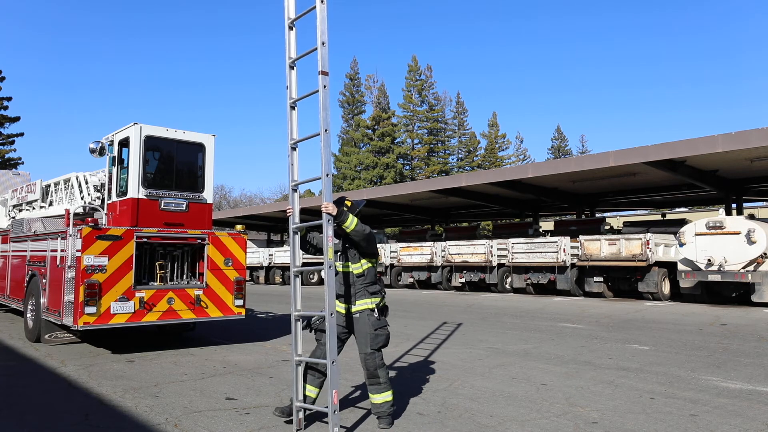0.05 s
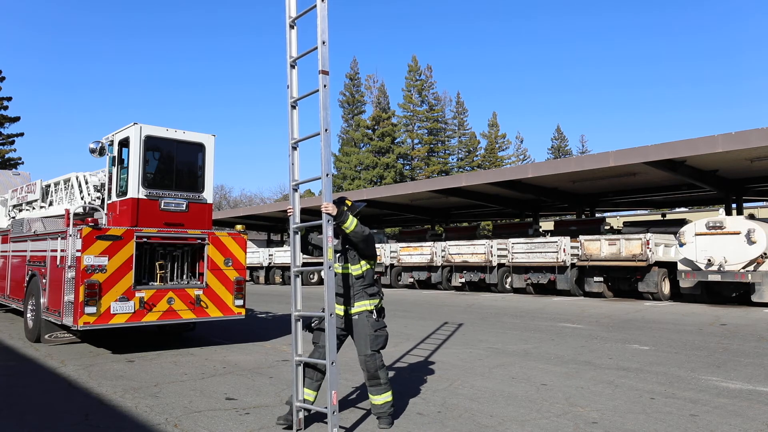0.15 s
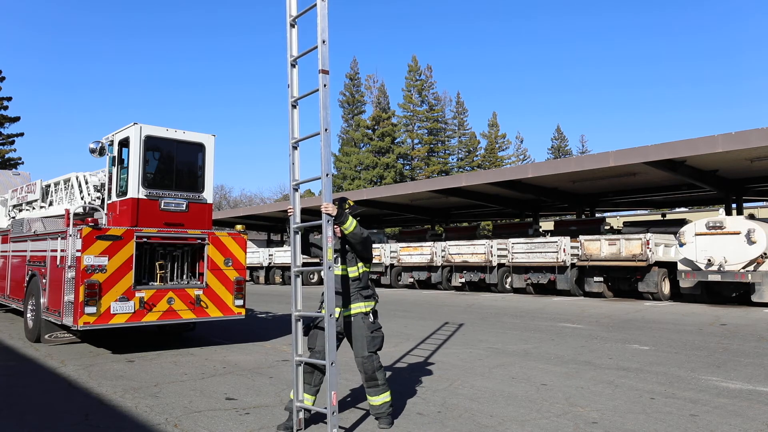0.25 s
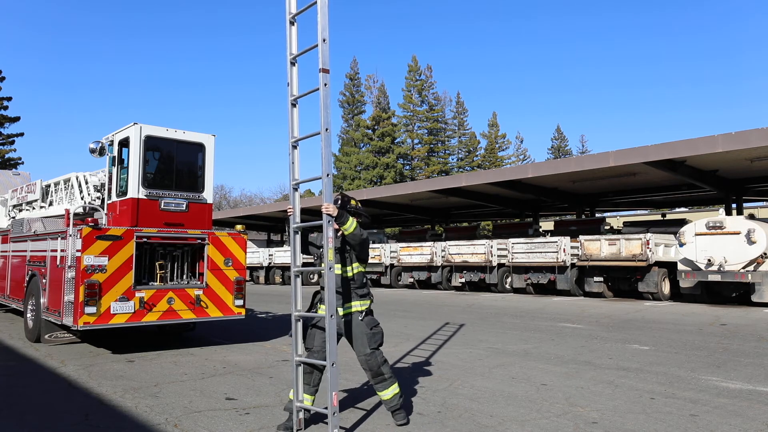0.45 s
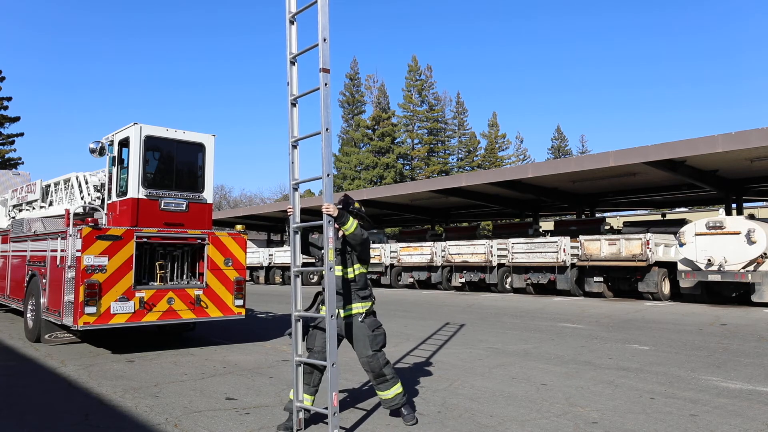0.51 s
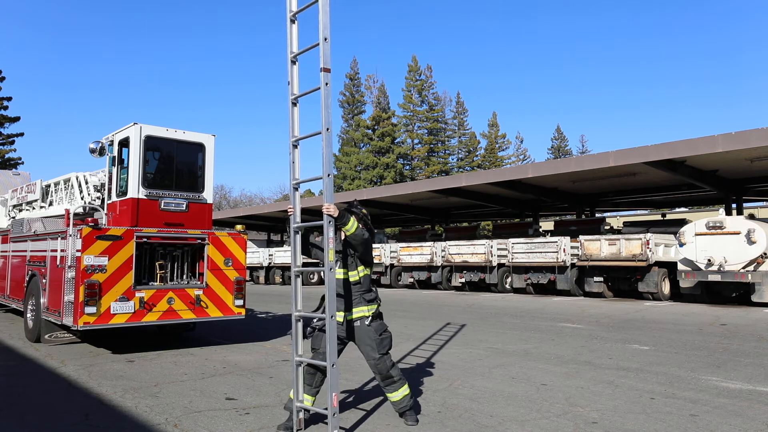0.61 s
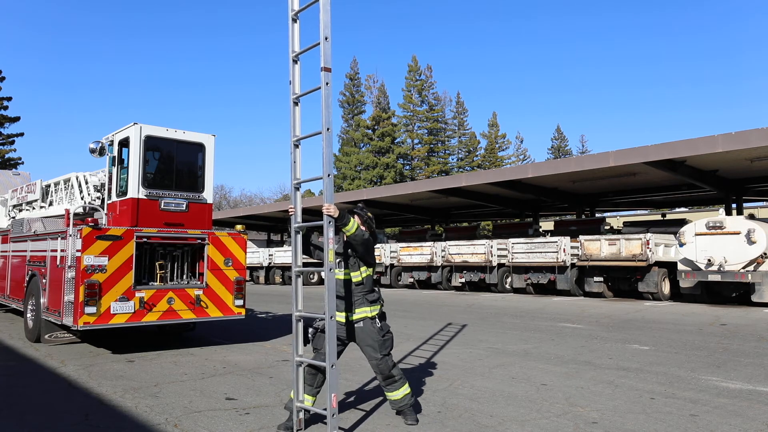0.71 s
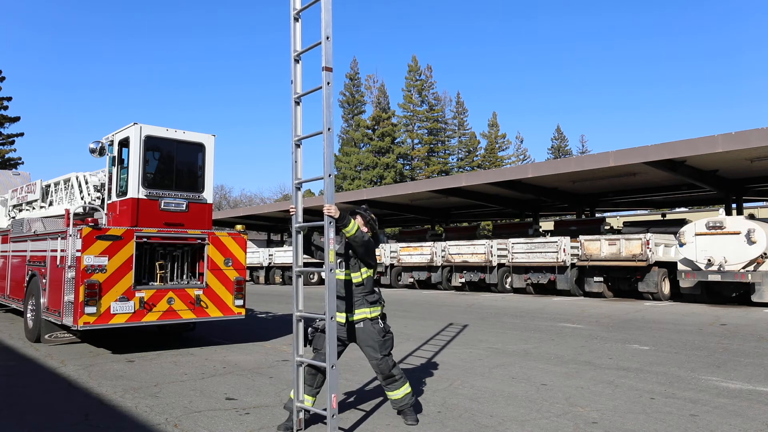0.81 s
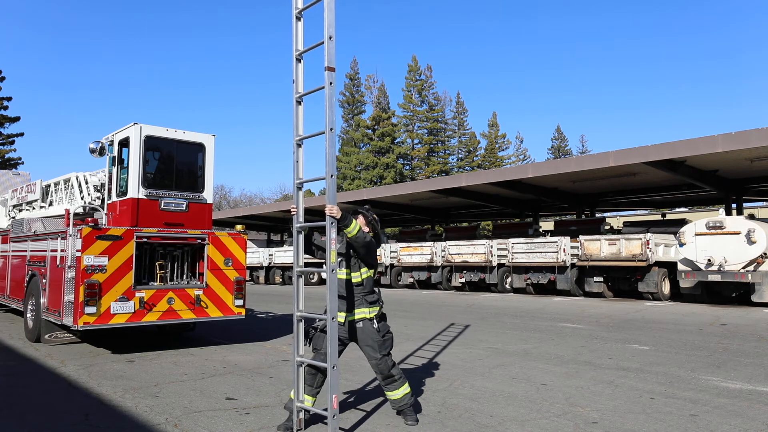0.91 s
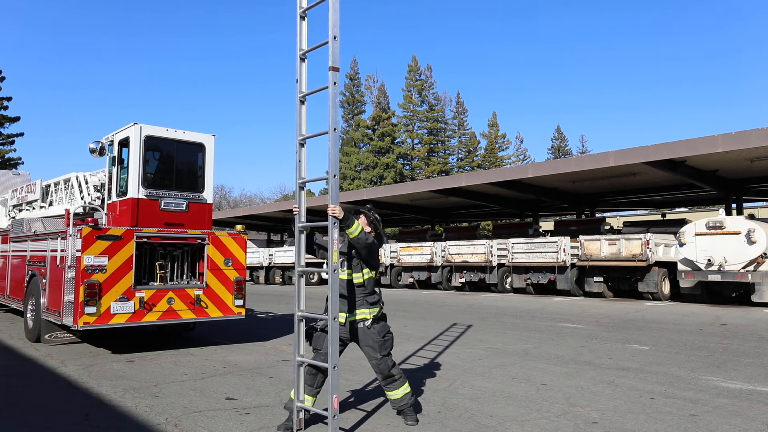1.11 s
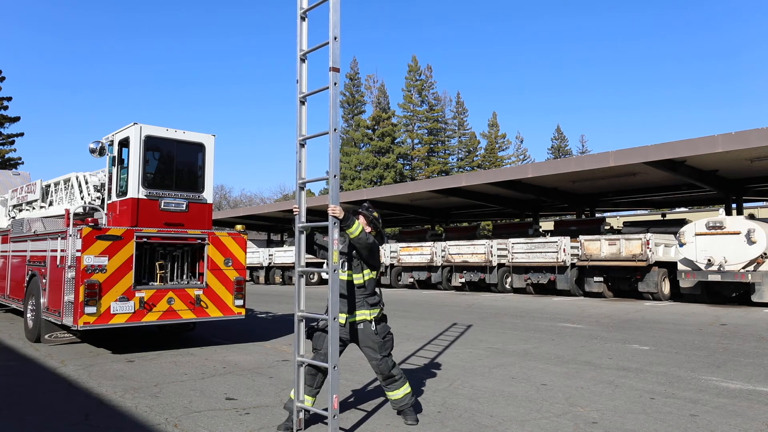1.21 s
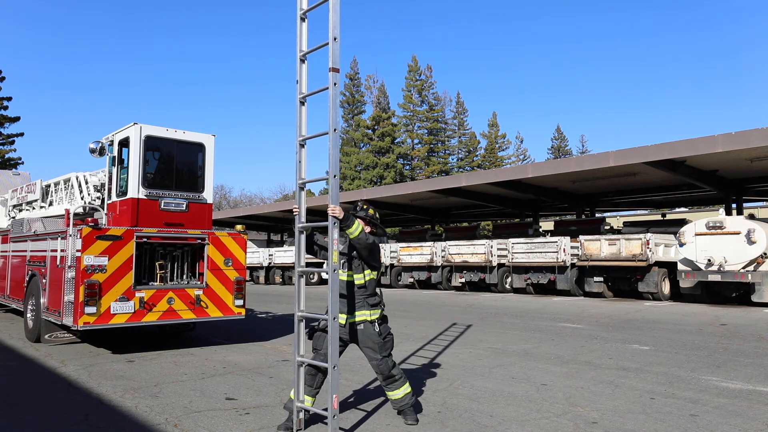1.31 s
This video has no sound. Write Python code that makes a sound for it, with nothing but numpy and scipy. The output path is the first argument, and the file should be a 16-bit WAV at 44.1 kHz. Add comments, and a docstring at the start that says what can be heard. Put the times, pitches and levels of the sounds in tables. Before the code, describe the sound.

An aluminium extension ladder clanks and rattles, its locks clacking, in a paved yard.

```python
"""A paved yard, where an upright aluminium extension ladder is worked a few metres away.
Its sections slam together and chatter, the steel rung locks clack, and looser knocks follow.
Each knock excites damped normal modes of rails and rungs; a lock pings, fittings tick, one squeak sounds.
Parked trucks and a carport reflect the sound, over outdoor air, a low hum and a distant engine."""
import sys
import numpy as np
from scipy import signal
from scipy.fft import rfft, irfft
from scipy.io import wavfile

SR = 44100
rng = np.random.default_rng(int(sys.argv[2]) if len(sys.argv) > 2 else 0)


def wrap_up_sound(samples):
    """Save the sound to the file named by the first command line argument, as 16-bit audio."""
    columns = np.atleast_2d(samples).T
    # keep every value between -1 and 1, then stretch to whole-number steps
    tamed = np.clip(columns, -1, 1)
    steps = np.round(tamed * 32767).astype(np.int16)
    wavfile.write(sys.argv[1], SR, steps)


N = 59535
T, FREQS = np.arange(N) / SR, np.arange(N // 2 + 1) * SR / N

# spectrum of the outdoor air (f/Hz, relative level/dB)
AIR_SPECTRUM = [(25, -15), (50, -5), (90, -3.5), (200, -3), (400, -8.5), (650, -10.5), (1000, -8.5),
                (1400, -12.5), (2000, -18.5), (2800, -28.5), (4000, -42.5), (7000, -44.5), (10500, -41),
                (13000, -43), (16000, -47)]
# resonances of the distant engine (f/Hz, width/Hz, rms level/dB)
ENGINE_RESONANCES = [(88.4, 12, -48), (110.4, 7.9, -47.5), (161.5, 24, -60.5)]
# envelope of a low hum that swells near the end (t/s, level/dB)
HUM_ENVELOPE = [(0, -53), (0.7, -51), (1.1, -62.5), (1.22, -52), (1.3, -42), (1.35, -60)]
# two pings of a rung lock, then one faint squeak (centre t/s, half duration/s, f/Hz, level/dB)
PINGS_AND_SQUEAK = [(-0, 0.031, 4190, -47.5), (0.076, 0.014, 4200, -51), (0.947, 0.021, 4620, -71)]
# impacts of loose fittings (t/s, level/dB)
TICKS = [(0.208, -2.5), (0.414, 6.5), (0.582, 3), (0.599, 3), (0.655, -0.5), (0.68, -4.5), (0.859, -6),
         (0.974, -5.5), (1.015, 3.5), (1.105, -10)]
# impacts of the rung locks (t/s, level/dB, chatter time/s)
CLACKS = [(0.428, -7, 0.01), (0.5254, -2.5, 0.0043), (0.5319, -10.5, 0.001), (0.559, -19, 0.0067),
          (0.632, -22.5, 0.0086), (0.701, -32, 0.0097), (0.863, -41, 0.0021)]
# impacts of the ladder sections (t/s, level/dB, bass gain/dB, treble gain/dB, chatter time/s,
# f/Hz favoured by the struck spot, gain there/dB, gain of the frame's ring/dB)
KNOCKS = [(0.001, -20, 8.5, -19.5, 0.0073, 1300, -6.5, 1.5), (0.022, -30, 12, 2.5, 0.0063, 2000, 13, -3),
          (0.065, -21, -3, -9, 0.014, 1870, 9, -1), (0.226, -2.5, 6.5, 5, 0.0041, 1450, 10.5, -5),
          (0.237, -9, -1, 10.5, 0.0048, 2500, 11, -6.5), (0.2528, -3.5, 2.5, 12.5, 0.0084, 2330, 1.5, -3),
          (0.2645, -4, -11, -8, 0.0023, 2330, 4, -16), (0.2735, -8.5, -3.5, 12.5, 0.00065, 2000, 7.5, 0),
          (0.3045, -14.5, -12, 10, 0.0047, 2000, 11, 0), (0.319, -16.5, 7, 2.5, 0.0058, 800, 4, 2.5),
          (0.355, -18.5, 4.5, 2.5, 0.007, 2000, 7, -3.5), (0.392, -25, -33, 5, 0.0051, 2000, -3, 2),
          (0.433, -17, -7, -9.5, 0.01, 1960, 11.5, 4.5), (0.531, -15, -12, -4.5, 0.0086, 1090, 6.5, 3),
          (0.5994, -31, -8, -7, 0.0037, 850, 23, -6), (0.637, -22.5, 3, -15, 0.0033, 1900, 9, 1.5),
          (1.013, -25.5, 20.5, 3, 0.0096, 1280, 8, -0.5), (1.045, -17.5, -10, -3, 0.015, 2230, 5, -4.5),
          (1.302, -33, 24, -19, .01, 1250, 7, 5.5), (1.342, -24, 15, -3, 0.01, 3450, -7, -1)]

# dense decaying responses (f/Hz, relative spectral level/dB, T60/s)
YARD_BANDS = [(100, 18.5, 0.99), (1020, -3, 1), (4000, -14, 1), (15000, -10, 0.31)]  # reflections from the yard
FITTING_BANDS = [(2000, 0, 0.039), (7000, -9, 0.078), (11000, -2, 0.097), (15000, -26, .03)]  # a loose fitting
HOUSING_BANDS = [(300, -12.5, 0.15), (2000, -12, 0.096), (4200, -5.5, 0.081), (6340, -7.5, 0.081),
                 (6900, 10.5, 0.087), (8400, -12, 0.077), (9540, -0.5, .06), (12400, -16.5, 0.053),
                 (16000, -37, 0.045)]  # a lock's housing
CRACK_BANDS = [(99, -23.5, 0.028), (283, -3, 0.1), (820, -3, 0.18), (1340, 3.5, .06), (2500, 3.5, 0.082),
               (4200, -8.5, 0.11), (7400, -11, 0.018), (10400, -6.5, 0.08), (12600, -21.5, 0.042),
               (16000, -33, 0.018)]  # the crack of a contact
WEAK_MODE_BANDS = [(100, -31, 0.69), (268, -14, .35), (550, -9.5, 0.44), (790, 3.5, 0.6), (1460, 1, 0.37),
                   (2500, -2, 0.58), (4200, -17, 0.48), (7070, -11.5, 0.16), (10200, -28, 0.5),
                   (15500, -50, .18)]  # the ladder's many weaker modes
# normal modes (f/Hz, relative level/dB, T60/s)
LOCK_MODES = [(4500, -15, 0.06), (4720, -15, 0.28), (5336, -4.5, 0.11), (7030, -5, 0.066),
              (6800, -0.5, 0.061), (7650, -1, .06), (7700, -16, 0.046), (9730, -11, 0.046),
              (10330, -9, .06)]  # a rung lock
FRAME_MODES = [(491.4, -7, 1), (677, -12.5, 0.083), (783, 1.5, 0.67), (969, -6.5, 0.9), (1087, 3.5, 0.38),
               (1280, 1.5, .6), (1303, 5, 0.39), (1512, -3, 0.95), (1540, -26, .5), (1737, -7, 0.4),
               (1970, -1, 0.43), (1970, 3, 0.26), (2193, -7.5, 0.42), (2466, -10, 0.22)]  # the strongest of rails and rungs


def undb(db):
    """Amplitude ratio: a factor of ten for every 20 dB."""
    return 10 ** (np.asarray(db) / 20)


def level(x, db):
    """Normalisation to an rms level."""
    return x * undb(db) / np.sqrt(np.mean(x ** 2))


def along(table, hz, column=1):
    """Interpolation of a table column on a log-frequency axis."""
    rows = np.array(table)
    return np.interp(np.log(hz + 1), np.log(rows[:, 0]), rows[:, column])


def resonance(hz, width):
    """Lorentzian curve: the gain halves at half the width from its centre."""
    return 1 / (1 + (2 * (FREQS - hz) / width) ** 2)


def noise(gain):
    """Spectral shaping of white noise."""
    return irfft(rfft(rng.standard_normal(N)) * gain, N)


def through(x, response):
    """Convolution: a linear system's output from its impulse response."""
    return signal.fftconvolve(x, response)[:N]


def colour(x, gain):
    """Minimum-phase filtering: folding the cepstrum makes the response causal."""
    cepstrum = irfft(np.log(gain), N)
    cepstrum[1:N // 2] *= 2
    cepstrum[N // 2:] = 0
    return through(x, irfft(np.exp(rfft(cepstrum)), N))


def damping(t60):
    """Exponential decay by 60 dB in t60 seconds."""
    return np.exp(-np.log(1000) * T / t60)


def dense_ring(table, mask=1):
    """Modal overlap: crowded modes act as noise, each half octave dying at its own rate."""
    spectrum = rfft(rng.standard_normal(N)) * undb(along(table, FREQS)) * mask
    band = np.round(2 * np.log2(np.maximum(FREQS, 60)))
    return sum(irfft(spectrum * (band == k), N) * damping(along(table, 2 ** (k / 2), column=2))
               for k in np.unique(band))


def modal_ring(modes):
    """Free vibration: a sum of damped sines of random sign."""
    return sum(rng.choice([-1, 1]) * undb(db) * np.sin(2 * np.pi * hz * T) * damping(t60)
               for hz, db, t60 in modes)


def contact(start, chatter_s, bounces_per_s=1600, even_split_s=0.0036):
    """Impact with rebounds: the longer the chatter, the more energy it takes from the first impulse."""
    age = T - start
    bounces = (rng.random(N) < bounces_per_s / SR) * rng.standard_normal(N)
    bounces *= (age > 0) * np.exp(-np.abs(age) / chatter_s)
    share = chatter_s / (chatter_s + even_split_s)
    force = bounces * np.sqrt(share / (np.sum(bounces ** 2) + 1e-12))
    force[int(max(start, 0) * SR)] += np.sqrt(1 - share)
    return force


def background():
    """Random fluctuation: narrow noise bands waver as engine rumble and a hum, over broadband air."""
    engine = sum(level(noise(resonance(hz, width)), db) for hz, width, db in ENGINE_RESONANCES)
    hum_db = np.interp(T, *np.array(HUM_ENVELOPE).T)
    hum = level(noise(resonance(hz=238, width=22)), hum_db)
    air = level(noise(undb(along(AIR_SPECTRUM, FREQS))), db=-41)
    return engine + hum + air


def yard_reflections(direct, build_up_s=0.033, gain_db=-15.5):
    """Reverberation: echoes from trucks and carport build up, then decay."""
    response = dense_ring(YARD_BANDS) * (1 - np.exp(-(T / build_up_s) ** 2))
    return undb(gain_db) * through(direct, response / np.sqrt(np.sum(response ** 2)))


def pings_and_squeak(width_hz=45):
    """Narrow-band resonance: a rung lock pings briefly at the start; later comes one faint squeak."""
    return sum(level(noise(resonance(hz, width_hz)), db) * np.exp(-((T - centre) / half) ** 2)
               for centre, half, hz, db in PINGS_AND_SQUEAK)


def fittings():
    """Rapid damping: small loose parts give only thin ticks when struck."""
    force = sum(undb(db) * contact(start, chatter_s=0.0097) for start, db in TICKS)
    return through(force, level(dense_ring(FITTING_BANDS), db=-72))


def rung_locks():
    """Impulse excitation: steel locks snap on the rungs, and lock and housing ring brightly."""
    force = sum(undb(db) * contact(start, chatter_s) for start, db, chatter_s in CLACKS)
    lock = level(modal_ring(LOCK_MODES), db=-47)
    housing = level(dense_ring(HOUSING_BANDS), db=-44)
    return through(force, lock + housing)


def ladder(bass_hz=380, treble_hz=4000, mode_gap_hz=10.2, variants=5):
    """Modal excitation depends on the struck spot: knocks share strong modes but vary in weak ones."""
    bass = 1 / (1 + (FREQS / bass_hz) ** 4)
    treble = 1 - 1 / (1 + (FREQS / treble_hz) ** 4)
    # each mask passes in full about one random spectral line per mode gap
    gap_bins = mode_gap_hz * N / SR
    masks = np.exp(-np.maximum(rng.random((variants, len(FREQS))) * gap_bins - 1, 0))
    strong_modes = level(modal_ring(FRAME_MODES), db=-39.5)
    frames = [strong_modes + level(dense_ring(WEAK_MODE_BANDS, mask), db=-34) for mask in masks]
    cracks = [level(dense_ring(CRACK_BANDS), db=-36) for _ in range(variants)]
    knocks = np.zeros(N)
    for k, (start, db, bass_db, treble_db, chatter_s, spot_hz, spot_db, ring_db) in enumerate(KNOCKS):
        spot = resonance(spot_hz, width=0.25 * spot_hz)
        gain = undb(db + bass_db * bass + treble_db * treble + spot_db * spot)
        force = colour(contact(start, chatter_s), gain)
        response = undb(ring_db) * frames[k % variants] + cracks[k % variants]
        knocks += through(force, response)
    return knocks


def scene():
    """Superposition of direct sound, reflections and background in one channel."""
    metal = ladder() + rung_locks() + fittings() + pings_and_squeak()
    return (metal + yard_reflections(metal) + background())[None]


def record(dry):
    """Band limiting: filters remove the deepest bass and the highest treble."""
    low_hz, top_hz = 66, 15900
    high_pass = signal.butter(2, low_hz, "high", fs=SR, output="sos")
    low_pass = signal.ellip(10, .2, 80, top_hz, fs=SR, output="sos")
    return signal.sosfilt(low_pass, signal.sosfilt(high_pass, dry))


dry = scene()
out = record(dry)
wrap_up_sound(out)
```